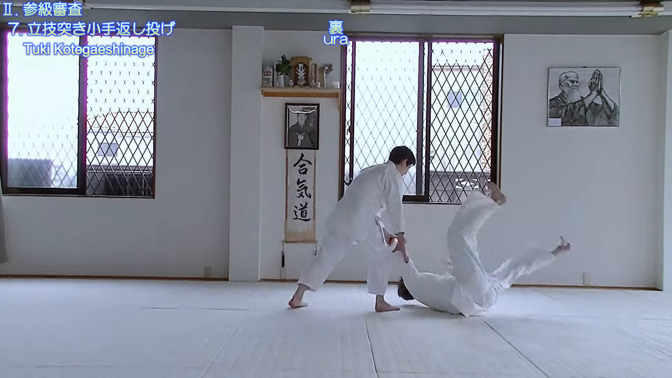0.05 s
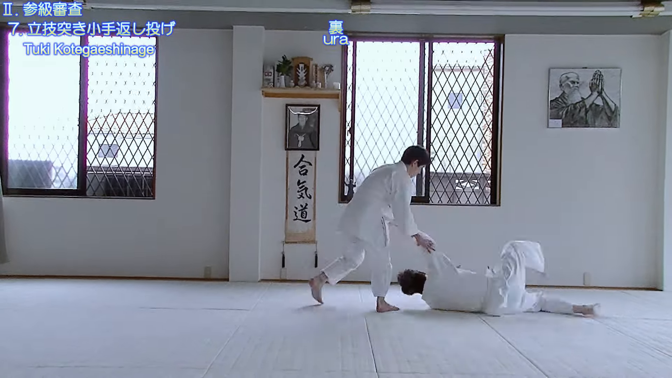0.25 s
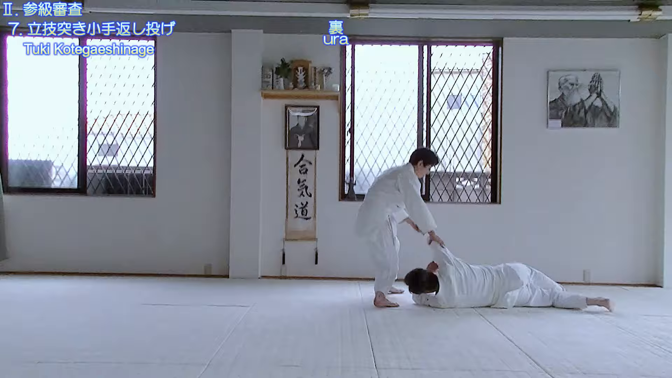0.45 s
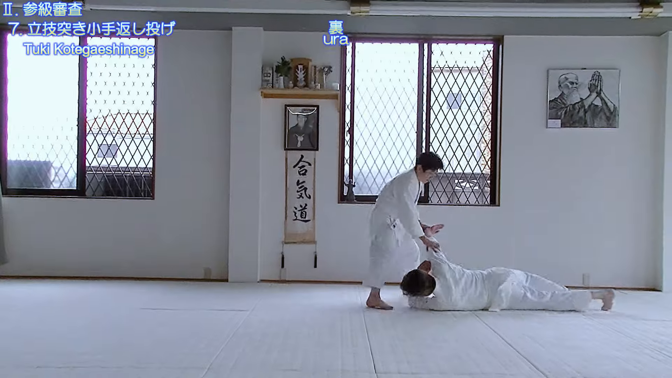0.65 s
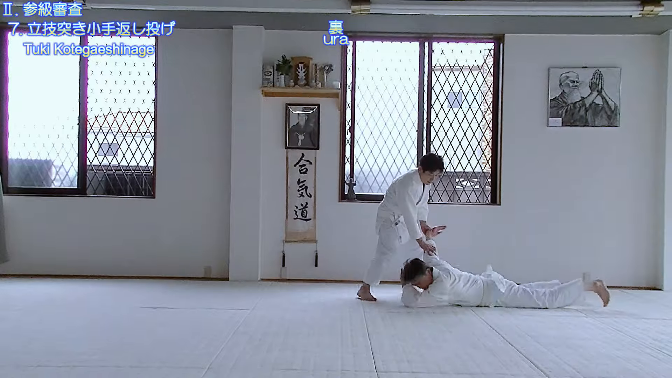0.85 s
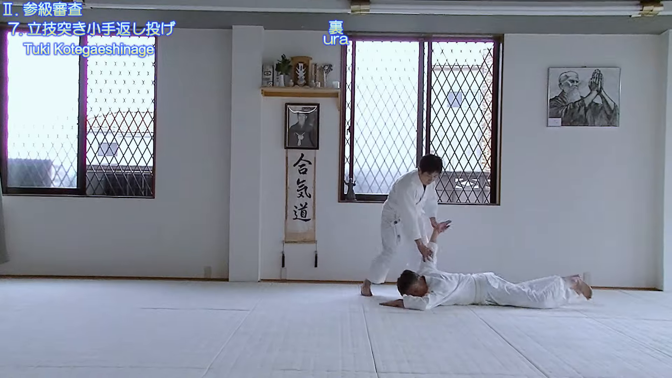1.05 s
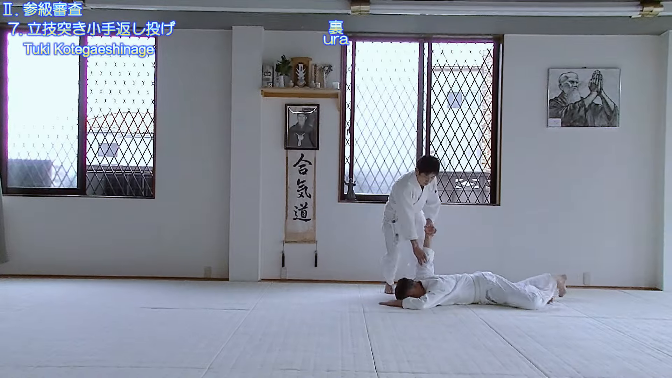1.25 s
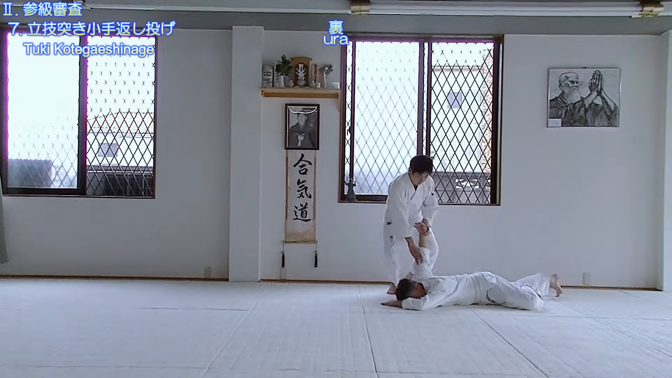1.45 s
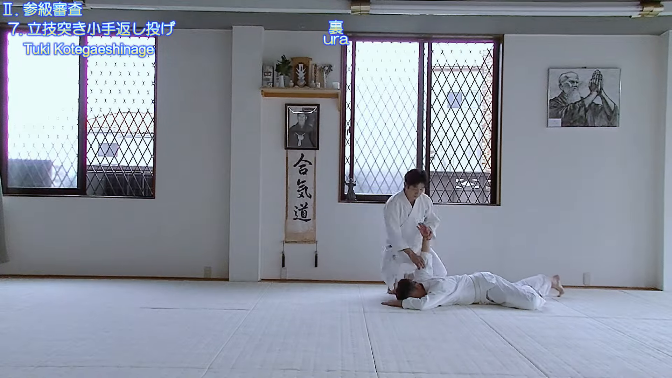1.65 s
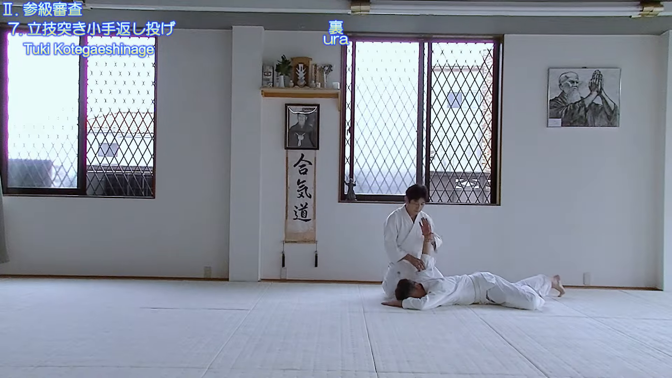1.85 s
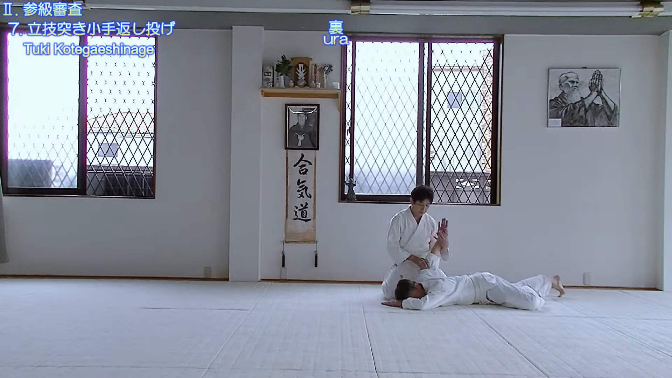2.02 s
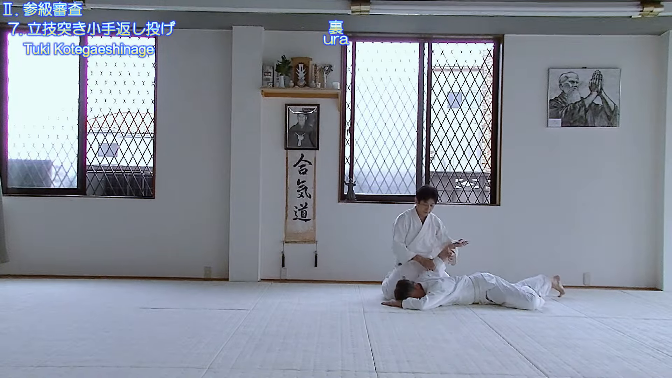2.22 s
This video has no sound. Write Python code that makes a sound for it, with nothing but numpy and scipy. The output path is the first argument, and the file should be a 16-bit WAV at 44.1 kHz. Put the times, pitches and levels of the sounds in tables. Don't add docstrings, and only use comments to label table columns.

```python
import sys
import numpy as np
from scipy import signal
from scipy.fft import rfft, irfft
from scipy.io import wavfile
from scipy.ndimage import uniform_filter1d

SR = 44100
rng = np.random.default_rng(int(sys.argv[2]) if len(sys.argv) > 2 else 0)


def bounce(signal):
    frames = np.transpose(np.atleast_2d(signal))
    limited = np.clip(frames, -1, 1)
    pcm = np.round(limited * 32767).astype(np.int16)
    wavfile.write(sys.argv[1], SR, pcm)


def invert_db(x):
    u = np.asarray(x, float) / 20
    return 10 ** u


N = 101430

# frequency in Hz, level in dB per Hz.
STREET_WASH = [(25, -15), (58, -6), (150, -6), (340, -1.5), (800, -5.5), (1700, -7.5), (4000, -24.5),
               (13500, -39.5)]
# centre in Hz, width in Hz, level in dB.
INSECT_BANDS = [(14380, 90, -72), (14430, 430, -60.5)]
# start in s, length in s, level in dB, start pitch in Hz, end pitch in Hz.
SQUEAKS = [
    (.585, .055, -38, 2150, 1950),
    (.655, .03, -43, 2000, 1950),
    (.698, .032, -38, 3100, 3550),
    (.765, .03, -41, 3300, 3200),
    (.775, .022, -38, 4550, 4600),
    (.82, .03, -41, 2900, 2950),
    (.94, .1, -34, 1065, 1065),
]
# start in s, length in s, hiss in dB, drag of the weight on the mat in dB.
CLOTH_STROKES = [(-.08, 0.15, -43, -38.5), (0.093, 0.3, -49.5, -39.5), (0.201, 0.22, -62, -26.5),
                 (0.357, 0.13, -34.5, -25.5), (0.43, 0.22, -32.5, -31.5), (0.606, 0.17, -40.5, -61),
                 (0.672, 0.18, -35, -61), (0.744, 0.19, -36.5, -41.5), (0.852, 0.36, -36.5, -35),
                 (1.015, 0.14, -56, -48.5), (1.123, 0.33, -41, -45.5), (1.425, 0.17, -50.5, -55),
                 (1.894, .12, -88, -52), (2.026, 0.15, -57, -71)]
# frequency in Hz, level in dB per Hz.
FABRIC_HISS = [(500, -27), (1500, -7), (3300, -3), (6000, -7), (10000, -11.5), (15500, -7)]
# frequency in Hz, level in dB per Hz.
MAT_DRAG = [(100, -10), (250, 4), (420, 5), (700, 6), (1200, -6.5), (2050, -5), (3200, -15), (6000, -27.5)]
# time in s, level in dB, ring pitch in Hz, ring level in dB, length in s.
SLAPS = [(0.212, -5, 4640, -12, 0.0014), (.216, -9.5, 1120, -7, 0.012), (0.229, -19, 2744, -8, 0.009),
         (.3485, -4, 1953, -1.5, 0.0037), (0.352, -34, 1970, -8, 0.002), (0.3554, -27.5, 4330, 9, 0.0034),
         (0.358, -11, 2090, -22, 0.0076), (0.413, -28, 1960, 2, 0.0087),
         (0.9833, -11.5, 3080, -2.5, 0.0063), (0.9879, -14.5, 3600, 2.5, 0.0052),
         (1, -19.5, 5260, -4.5, 0.008), (1.458, -42, 4080, -5, 0.019)]
# frequency in Hz, level in dB per Hz.
SKIN_CRACK = [(300, 8), (800, 5.5), (1500, -3), (3000, -1), (6500, -12), (10000, -26), (15500, -58)]
# time in s, level in dB, mat pitch in Hz, boom into the floor in dB.
THUDS = [(.034, -20.5, 280, -5), (.075, -25, 294, 3.5), (.195, -36, 269, 10), (.2135, -9.5, 332, -17),
         (0.2185, -10.5, 114, -9), (.226, -6, 430, -30), (0.235, -13, 183, -28), (.274, -14.5, 195, -27),
         (0.348, -3.5, 265, -42), (.384, -16, 109.2, -2), (.414, -24, 412, -6), (.442, -12, 203, -26),
         (.48, -13, 221, -36), (.514, -13, 242, -21), (.55, -21, 278, -0.5), (.633, -23.5, 266, -5),
         (.772, -27.5, 263, -19), (.826, -16, 338, -41), (.842, -18.5, 292, -30), (.903, -26, 385, -18),
         (.972, -18, 302, -18), (0.9843, -5.5, 300, -46), (.997, -9.5, 379, -36), (1.011, -13, 226, -29),
         (1.059, -14, 297, -4), (1.099, -18, 292, -4), (1.132, -33, 200, -20), (1.17, -27.5, 191, -32),
         (1.9, -37, 305, 3)]
# frequency in Hz, level in dB, 60 dB decay time in s.
FLOOR_MODES = [(64.8, -5, 0.74), (105.9, 3, 0.17), (174.4, 0, 0.21)]
# frequency in Hz, 60 dB decay time in s.
HALL_DECAY = [(80, 0.44), (260, 0.61), (700, 0.96), (1840, 0.89), (4850, 0.9), (12000, 0.14)]
# delay in s, level in dB.
WALL_ECHOES = [(.0041, -10.5), (.0093, -18), (0.0158, -8), (0.0219, -12.5)]
# frequency in Hz, gain in dB.
CAPSULE = [(30, -6.5), (55, 3), (9000, -1.5), (12500, -5.5), (16000, -20)]
# frequency in Hz, side level in dB.
STEREO_WIDTH = [(60, -30), (300, -21), (700, -17), (1500, -13), (4000, -7.5), (9000, -8), (14000, -22)]
# frequency in Hz, left over right in dB.
CAPSULE_LEAN = [(60, -2), (240, -2), (950, -2), (3770, 0.5), (15000, 1)]
# frequency in Hz, gain in dB.
TREBLE_EDGE = [(14900, -0.5), (15200, -4), (15500, -16), (16000, -30)]


def evened(x):
    return x / np.sqrt(np.mean(x ** 2) + 1e-20)


def read(points, hz):
    f, value = np.transpose(points)
    return np.interp(np.log(hz + 1), np.log(f + 1), value)


def colour(x, points):
    length = x.shape[-1]
    gain = invert_db(read(points, np.fft.rfftfreq(length, 1 / SR)))
    return irfft(rfft(x) * gain, length)


def add(mix, s, sound):
    part = mix[max(round(s * SR), 0):][:len(sound)]
    part += sound[:len(part)]


def resonate(x, hz, width_hz):
    turn = np.exp(2j * np.pi * np.cumsum(hz * np.ones(len(x))) / SR)
    r = np.exp(-np.pi * width_hz / SR)
    smooth = signal.lfilter([1 - r], [1, -r], x / turn + 1e-18)
    return 2 * (turn * smooth).real


def narrow_noise(z, hz, width_hz):
    return evened(resonate(resonate(z, hz, width_hz), hz, width_hz))


def flicker(depth_db, span_s):
    size = max(int(span_s * SR), 1)
    wander = uniform_filter1d(uniform_filter1d(rng.standard_normal(N), size), size)
    return invert_db(depth_db * evened(wander))


def outside():
    gusts = flicker(0.4, 0.017) * flicker(0.32, 0.0053)
    wash = invert_db(-42.5) * evened(colour(rng.standard_normal((2, N)) * gusts, STREET_WASH))
    insects = np.zeros(N)
    for hz, width_hz, db in INSECT_BANDS:
        insects += invert_db(db) * narrow_noise(rng.standard_normal(N), hz, width_hz)
    hum = invert_db(-55.5) * evened(resonate(rng.standard_normal(N), 70.2, 4.2))
    return wash + [insects * flicker(1.9, 0.011) + hum, insects[::-1]]


def squeaks():
    out = np.zeros(N)
    for s, length, db, from_hz, to_hz in SQUEAKS:
        u = np.arange(0, length, 1 / SR) / length
        z = rng.standard_normal(SR // 4)[:len(u)]
        hz = from_hz + (to_hz - from_hz) * u
        width_hz = 76 * from_hz / 3000
        add(out, s, invert_db(db) * np.sin(np.pi * u) * narrow_noise(z, hz, width_hz))
    return out


def cloth():
    start, length, hiss_db, drag_db = np.transpose(CLOTH_STROKES)[:, :, None]
    u = np.clip((np.arange(N) / SR - start) / length, 0, 1)
    rise = 0.3
    swell = np.sin(np.pi / 2 * np.minimum(u / rise, (1 - u) / (1 - rise)))
    hiss = evened(colour(rng.standard_normal(N) * flicker(1.1, 0.0043), FABRIC_HISS))
    drag = evened(colour(rng.standard_normal(N) * flicker(0.83, 0.0043), MAT_DRAG))
    return (swell * invert_db(hiss_db)).sum(0) * hiss + (swell * invert_db(drag_db)).sum(0) * drag


def slaps():
    out = np.zeros(N)
    t = np.arange(SR // 8) / SR
    for s, db, hz, ring_db, length in SLAPS:
        spray, drift = rng.standard_normal((2, len(t)))
        wobble = 0.051 * evened(uniform_filter1d(drift, size=60))
        ring = np.sin(2 * np.pi * np.cumsum(hz * (1 + wobble)) / SR)
        tone = evened(colour(spray, SKIN_CRACK)) + invert_db(ring_db + 3) * ring
        contact = np.minimum(t / 0.0002, 1) * np.exp(-(t / length) ** 2)
        add(out, s, invert_db(db - 7.5) * tone * contact)
    return out


def floor_boom(t):
    boom = np.zeros(len(t))
    for hz, db, t60 in FLOOR_MODES:
        boom += invert_db(db - 60 * t / t60) * np.sin(2 * np.pi * hz * t)
    return boom * np.minimum(t / 0.018, 1)


def thuds():
    out = np.zeros(N)
    t = np.arange(SR // 2) / SR
    boom = floor_boom(t)
    for s, db, hz, boom_db in THUDS:
        decay = invert_db(-60 * t * hz / 11)
        knock = np.minimum(t / 0.0025, 1) * decay * -np.sin(2 * np.pi * hz * t)
        air = evened(resonate(rng.standard_normal(len(t)), 650, width_hz=520))
        puff = air * np.minimum(t / 0.0015, 1) * np.exp(-t / 0.017)
        add(out, s, invert_db(db) * (knock + invert_db(-14.5) * puff + invert_db(boom_db - 14.5) * boom))
    return out


def hall(x):
    taps = np.zeros((2, SR))
    at = np.arange(300, SR - 20, 20) + rng.integers(0, 20, (2, (SR - 301) // 20))
    np.put_along_axis(taps, at, rng.choice([-1., 1.], at.shape), 1)
    hz, t, z = signal.stft(taps, SR, nperseg=512)
    decay = invert_db(-60 * t / read(HALL_DECAY, hz)[:, None])
    tail = signal.istft(z * decay, SR, nperseg=512)[1]
    tail = invert_db(-5) * tail / np.linalg.norm(tail[0])
    return signal.fftconvolve(x[None], tail, axes=1)[:, :N]


def walls(x):
    out = x.copy()
    for s, db in WALL_ECHOES:
        add(out, s, invert_db(db) * x[:N - round(s * SR)])
    return out


def scene():
    blows = invert_db(-2) * (thuds() + slaps())
    rubs, skin = cloth(), squeaks()
    mid, wide = hall(blows + invert_db(-4) * rubs + invert_db(-3) * skin)
    inside = np.array([mid + walls(blows) + rubs + skin, wide])
    mid, wide = colour(inside, CAPSULE) + outside()
    side = colour(wide, STEREO_WIDTH)
    return np.array([mid + side, mid - side])


def top_cut(x):
    return signal.sosfilt(signal.butter(12, 15780, fs=SR, output="sos"), x)


def record(dry):
    left = colour(dry[0], [(hz, db / 2) for hz, db in CAPSULE_LEAN])
    right = colour(dry[1], [(hz, -db / 2) for hz, db in CAPSULE_LEAN])
    mix = colour(np.array([left, right]), TREBLE_EDGE)
    return top_cut(mix)


dry = scene()
out = record(dry)
bounce(out)
```